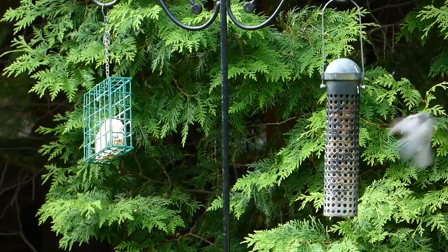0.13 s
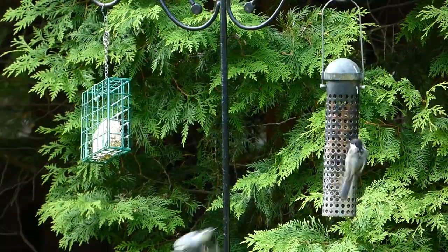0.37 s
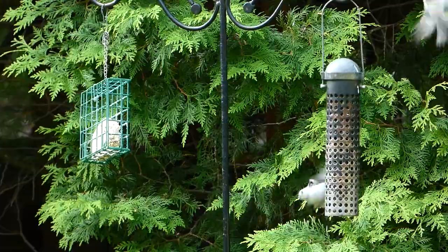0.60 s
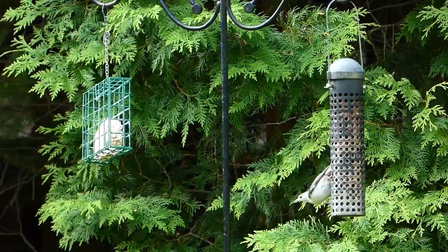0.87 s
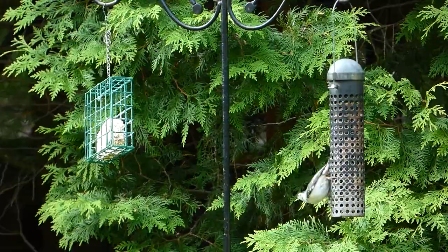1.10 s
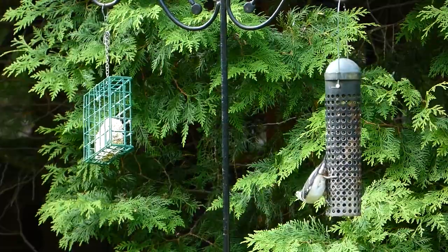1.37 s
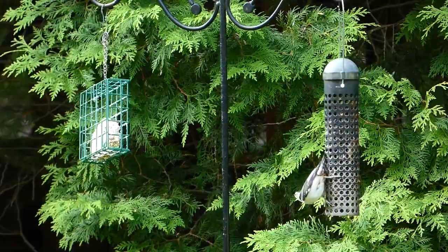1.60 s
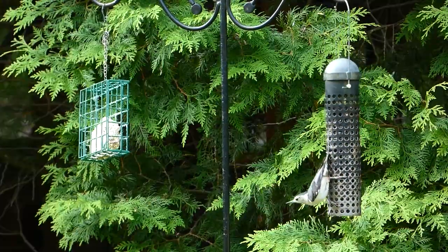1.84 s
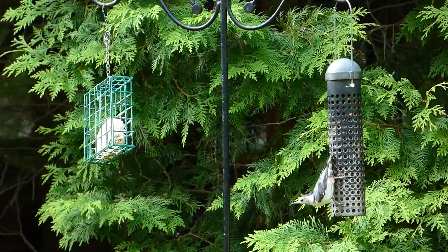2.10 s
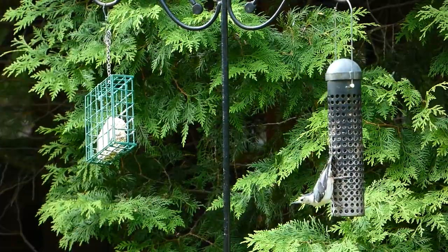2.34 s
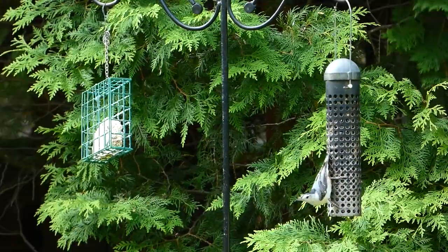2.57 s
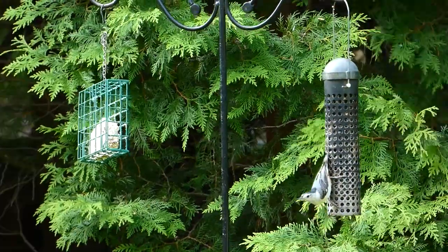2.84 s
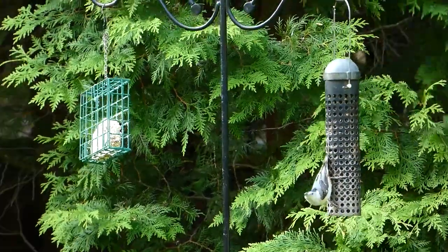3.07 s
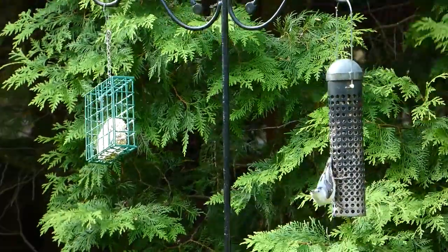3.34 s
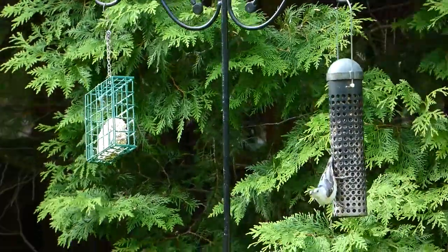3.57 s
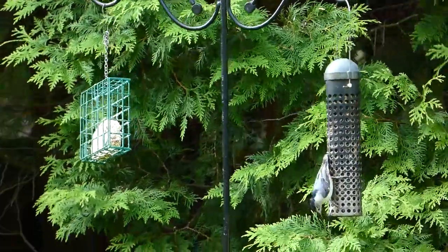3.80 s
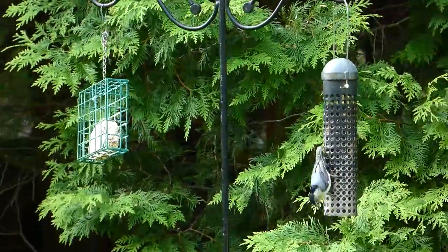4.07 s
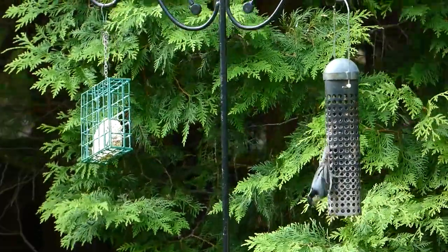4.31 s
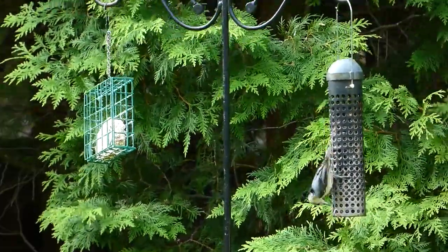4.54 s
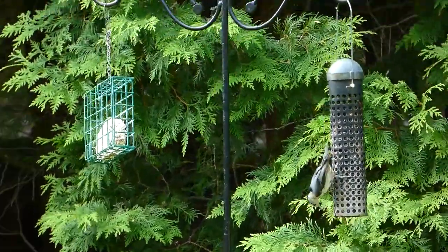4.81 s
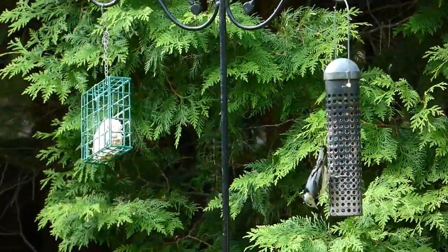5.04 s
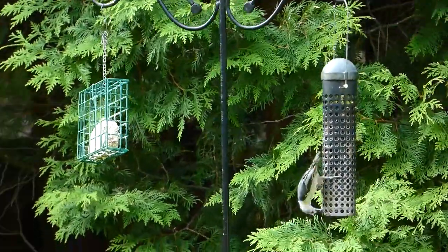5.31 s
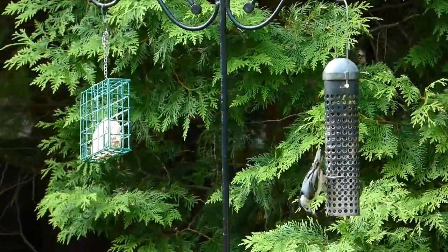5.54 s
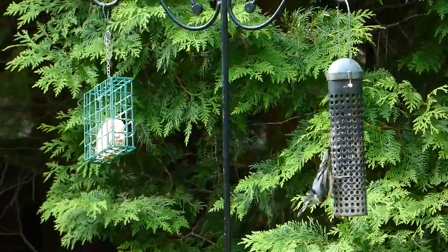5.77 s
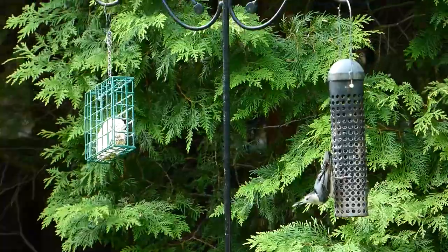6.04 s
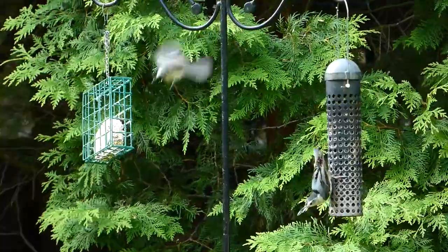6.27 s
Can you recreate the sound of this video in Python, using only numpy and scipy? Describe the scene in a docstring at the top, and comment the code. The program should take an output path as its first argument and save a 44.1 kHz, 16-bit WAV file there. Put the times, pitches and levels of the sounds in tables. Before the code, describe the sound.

Outdoor stereo sound of small birds at hanging feeders beside evergreen foliage. A hoarse, nasal jay screeches twice early and twice later. Between them come thin whistles, fast sliding chirps, a four-times-repeated rising pair and a rapid trill. Buzzy notes follow, then a thinner stretch and a final cluster of clear chirps as a bird whirs off. Faint beak or claw taps, quiet traffic rumble and a briefly swelling motor hum sit behind.

```python
"""Backyard birds

A jay screams four times with both halves of its voice box (products of two oscillators), songbirds whistle
and trill (gliding tones) and buzz (harmonics under a resonance), something ticks on a feeder (noise taps) and
wings flutter past at the end (pulsed noise). Trees and house walls smear and echo every note (convolution)
over a low suburban rumble (shaped noise) and a motor hum that swells, then fades (a wavering tone)."""
import sys
import numpy as np
from scipy import signal
from scipy.fft import rfft, irfft
from scipy.io import wavfile
from scipy.ndimage import uniform_filter1d, map_coordinates

SR = 44100
rng = np.random.default_rng(int(sys.argv[2]) if len(sys.argv) > 2 else 0)


def volts(x):
    """Linear amplitude factor 10**(x/20) for a level x in dB, scalar or array-like."""
    e = np.asarray(x, float) / 20
    return 10 ** e


def put_to_file(sound):
    """Save the sound as 16-bit audio at rate SR, in the file named by the first command-line argument."""
    columns = np.atleast_2d(sound).T  # one column per channel
    safe = np.clip(columns, -1, 1)
    whole_steps = np.round(safe * 32767)
    wavfile.write(sys.argv[1], SR, whole_steps.astype(np.int16))


N = 282240  # length of the scene [samples]


def coloured(points, size=N):
    """Spectral shaping: noise of rms 1 whose spectrum follows (frequency [Hz], level [dB]) points."""
    hz, db = np.transpose(points)
    f = np.maximum(np.arange(size // 2 + 1) * SR / size, 1)
    gain = volts(np.interp(np.log(f), np.log(hz), db))
    x = irfft(rfft(rng.standard_normal(size)) * gain, size)
    return x / x.std()


def curve(points):
    """Linear interpolation: a (time [s], value) table read at every sample."""
    return np.interp(np.arange(N) / SR, *np.transpose(points))


def walk(rate):
    """Low-pass random modulation: levels held 1 / rate s and smoothed twice; spread near 1."""
    hold = int(SR / rate)
    steps = rng.standard_normal(N // hold + 1)
    held = np.repeat(steps, hold)
    return 1.28 * uniform_filter1d(uniform_filter1d(held, hold), hold)[:N]


def add(out, s, x):
    """Superposition: mixes x into out from time s."""
    a = int(s * SR)
    out[a:a + len(x)] += x[:N - a]


# spectrum of distant traffic and leaves: (frequency [Hz], density [dB per Hz])
YARD_SPECTRUM = [(15, -31), (25, -13), (50, -8.5), (100, 1.5), (130, 3), (170, -6.5), (260, 0), (420, -5.5),
                 (630, -9.5), (1000, -9), (1700, -16.5), (2500, -13.5), (4000, -12), (6300, -14.5),
                 (8500, -21), (11000, -23), (15500, -39)]
# likeness of the two channels: (frequency [Hz], left-right correlation)
CHANNEL_LIKENESS = [(60, 0.71), (130, -0.28), (290, -0.53), (640, -0.57), (1410, -0.23), (3100, 0.55),
                    (6820, 0.71), (15000, -0.006)]
# balance of the two channels: (frequency [Hz], left minus right [dB])
CHANNEL_BALANCE = [(25, 6), (80, -11), (160, 1), (300, 0.5), (1000, -.5), (15000, -0.5)]
# motor hum before its waver and its balance: (time [s], level [dB])
HUM_LEVEL = [(0, -72.5), (1, -64), (2, -67), (3, -71.5), (4, -76.5), (6.4, -96)]
YARD_DB, YARD_SWELL_DB = -63, 0.9  # middle level of the air noise, spread of its slow swell


def yard():
    """Partial coherence: shared and opposed noise of traffic and leaves mixed by frequency, plus a hum."""
    f = np.log(np.maximum(np.arange(N // 2 + 1) * SR / N, 1))
    like_hz, like = np.transpose(CHANNEL_LIKENESS)
    like = np.clip(np.interp(f, np.log(like_hz), like), -0.95, 0.95)
    balance_hz, balance_db = np.transpose(CHANNEL_BALANCE)
    tilt_db = np.interp(f, np.log(balance_hz), balance_db) / 2
    mid = rfft(coloured(YARD_SPECTRUM))
    side = rfft(coloured(YARD_SPECTRUM)) * np.sqrt((1 - like) / (1 + like))
    air = irfft(np.array([(mid + side) * volts(tilt_db), (mid - side) * volts(-tilt_db)]), N)
    air = air * volts(YARD_DB + YARD_SWELL_DB * walk(2.224))
    hum_hz = 137 + 2.41 * walk(11)
    hum = np.sin(2 * np.pi * np.cumsum(hum_hz) / SR) * volts(curve(HUM_LEVEL) + 2.3 * walk(17))
    return air + hum * volts(np.array([[-2.0], [3.0]]))


# jay screams, pitches before scoop and sag, level before swell and flutter:
# (time [s], length [s], upper voice [Hz], lower voice [Hz], level [dB])
SCREAMS = [(0.249, 0.33, 1819, 965.6, -49.5), (0.987, 0.32, 1805, 949.4, -50.5),
           (3.693, 0.294, 1799, 922, -49.5), (4.442, 0.32, 1814, 905.5, -51.5)]
# the two voices multiply each other, so lines stand at sums of both: (multiple of upper, multiple of lower)
SUM_LINES = [(0, 1), (1, 0), (1, 1), (0, 3), (2, 0), (1, 2), (2, 1), (1, 3), (3, 0), (2, 2), (3, 1), (2, 3),
             (4, 0), (3, 2), (4, 1), (5, 0), (4, 2), (5, 1)]
# base level of each sum line: (level [dB])
SUM_LINE_DB = [-26, -4, -1, -32, -1, -3.5, -8.5, -19, -10, -26, -13, -14.5, -19.5, -24.5, -32, -27, -22.5,
               -36]
# tilt of each scream as the bird turns its head: (change per step up the stack [dB])
SCREAM_TILT_DB = [0.0, -.3, -1.4, -1.7]
# both voices scoop up to pitch (share of pitch, time constant); the upper one then sags faster and faster
SCOOP_UPPER, SCOOP_UPPER_S, SCOOP_LOWER, SCOOP_LOWER_S, SAG_HZ_PER_S2 = 0.23, 0.013, 0.14, 0.035, 1600
JAY_ATTACK_S, JAY_RELEASE_S, JAY_SWELL_DB_PER_S = 0.036, 0.026, 6.0
JAY_BALANCE_DB = 2.6  # spread by which each line swells and fades on its own


def jay():
    """Intermodulation: two unsteady oscillators sound at their sum lines, with a rasp of breath on each."""
    out = np.zeros(N)
    upper_wobble, lower_wobble, flutter = walk(120), walk(120), walk(60)
    balance = [volts(JAY_BALANCE_DB * walk(22)) for _ in SUM_LINES]
    rasp = coloured([(1, 11.5), (300, 5.0), (650, 0.5), (20000, -52)])
    for (s, length_s, upper_hz, lower_hz, db), tilt_db in zip(SCREAMS, SCREAM_TILT_DB):
        on = slice(int(s * SR), int((s + length_s) * SR))
        t = np.arange(on.stop - on.start) / SR
        upper_hz = upper_hz * (1 - SCOOP_UPPER * np.exp(-t / SCOOP_UPPER_S)) - SAG_HZ_PER_S2 * t ** 2
        lower_hz = lower_hz * (1 - SCOOP_LOWER * np.exp(-t / SCOOP_LOWER_S))
        upper = 2 * np.pi * np.cumsum(upper_hz * (1 + 0.00502 * upper_wobble[on])) / SR
        lower = 2 * np.pi * np.cumsum(lower_hz * (1 + 0.00502 * lower_wobble[on])) / SR
        # the voice turns hoarser as the breath runs out, most of all high in the stack
        hoarse = np.linspace(0.015, 0.085, len(t))
        # one step of the stack speaks first, the rest as the beak opens
        opening = 1 - np.exp(-(t / 0.031) ** 2)
        lines = np.zeros(len(t))
        for (m, n), line_db, own in zip(SUM_LINES, SUM_LINE_DB, balance):
            step = 2 * m + n  # height in the stack
            line = volts(line_db + tilt_db * max(step - 4.5, -1.5)) * np.sin(m * upper + n * lower)
            line = line * (1 + step * hoarse * rasp[on]) * own[on]
            lines += line if step == 4 else line * opening
        edges = np.minimum(1, np.minimum(t / JAY_ATTACK_S, (length_s - t) / JAY_RELEASE_S)) ** 0.74
        swell_db = JAY_SWELL_DB_PER_S * (t - length_s / 2)
        out[on] = lines * edges * volts(db + swell_db + 1.57 * flutter[on])
    return out


# ground and house walls: (delay [s], level before a common 21 dB cut [dB], spread [s])
REFLECTIONS = [(.007, -6.5, 0.003), (0.015, -7, 0.0034), (0.088, -12, 0.0014), (0.176, -26.5, 0.0043)]


def outdoors(x):
    """Impulse response: direct sound, leaf scatter, echoes and a thin tail, partly unlike in each ear."""
    t = np.arange(SR) / SR
    leaves = volts(-35) * np.exp(-t / 0.046)
    # the tail loses 60 dB in 1.164 s
    tail = volts(-43) * np.exp(-np.log(1000) * t / 1.164) * (1 - np.exp(-t / 0.006))
    # each echo comes back spread over a few milliseconds
    walls = sum(volts(db - 21) * np.exp(-((t - delay) / spread) ** 2) for delay, db, spread in REFLECTIONS)
    envelope = np.sqrt(leaves ** 2 + tail ** 2 + walls ** 2)
    air = [(100, -2.5), (1900, -12), (3000, -4.0), (6000, 1), (9000, -2.5), (16000, -12.5)]
    mid = coloured(air, size=SR) * envelope
    side = coloured(air, size=SR) * envelope
    response = np.array([mid + 0.34 * side, mid - 0.53 * side])
    # swaying foliage shifts the reflected paths by a few samples, which blurs held tones
    swayed = map_coordinates(x, [np.arange(N) + 1.47 * walk(45)], order=3)
    return x + signal.fftconvolve(swayed[None], response, axes=1)[:, :N]


# short soft hoots far off: (time [s], length [ms], middle pitch [Hz], level [dB])
FAR_HOOTS = [(0.331, 56, 418, -59.5), (3.07, 47, 455, -66.5), (3.58, 45, 440, -65.5)]
# held whistles: (time [s], length [ms], middle pitch [Hz], level [dB])
HELD_NOTES = [(5.218, 15, 3550, -65), (6.077, 24, 4130, -68), (.641, 12, 4030, -55.5),
              (1.447, 27, 4150, -52), (1.584, 65, 3960, -59), (1.636, 90, 4096, -48.5),
              (1.732, 28, 4115, -49), (1.842, 23, 6320, -58), (2.44, 54, 5230, -60),
              (2.518, 55, 4460, -50.5), (3.587, 20, 6080, -59), (3.643, 7.5, 4930, -48),
              (5.341, 54, 3930, -64.5), (6.105, 16, 5460, -59), (6.193, 11, 5350, -52.5)]
ARCH = 0.0225  # share of the pitch by which both ends lie lower


def held_notes():
    """Pitch arch: each note, as (s, ms, start Hz, middle Hz, end Hz, dB), is highest at half length."""
    return [(s, ms, hz * (1 - ARCH), hz, hz * (1 - ARCH), db)
            for s, ms, hz, db in list(HELD_NOTES) + list(FAR_HOOTS)]


def whistles():
    """Near-sinusoidal phonation: tones glide along parabolas, with a faint octave and an uneven breath."""
    out, waver = np.zeros(N), 1 + 0.007 * walk(400)
    for s, ms, start_hz, mid_hz, end_hz, db in held_notes() + glides() + paired_notes() + trill():
        u = np.linspace(0, 1, int(ms * SR / 1000))
        # the parabola through the start, middle and end pitch
        hz = start_hz * (1 - u) * (1 - 2 * u) + 4 * mid_hz * u * (1 - u) + end_hz * u * (2 * u - 1)
        phase = 2 * np.pi * np.cumsum(hz * np.resize(waver[int(s * SR):], len(u))) / SR
        swell = np.sin(np.pi * u ** 0.83) ** 0.5
        add(out, s, volts(db) * swell * (np.sin(phase) + volts(-39) * np.sin(2 * phase)))
    breath = coloured([(1, 11), (500, -6.5), (1400, -8.5), (20000, -43)])
    return out * volts(0.53 * walk(250)) * (1 + 0.11 * breath)


# beak and claw ticks on the feeder: (time [s], level at the onset [dB])
FEEDER_TICKS = [(0.59, -55), (0.8874, -58), (3.4083, -56), (4.8469, -55), (6.2477, -56.5)]
# spectrum of a tick: (frequency [Hz], density [dB per Hz])
TICK_SPECTRUM = [(1000, -41), (4000, -5), (8500, -8), (12000, -15), (16000, -18)]


def ticks():
    """Impact excitation: very short bright noise taps that decay exponentially."""
    out, n = np.zeros(N), np.arange(400)
    for s, db in FEEDER_TICKS:
        add(out, s, volts(db) * coloured(TICK_SPECTRUM, size=len(n)) * np.exp(-n / 91))
    return out


# chirps, and two wall echoes of the one at 3.68 s, leap away from their start and settle:
# (time [s], length [ms], start [Hz], end [Hz], level [dB])
EARLY_LEAPS = [(1.582, 12, 5290, 6300, -53.5), (1.614, 40, 8140, 6560, -63.5), (1.644, 60, 6570, 6200, -64),
               (1.766, 35, 4275, 2570, -42), (1.79, 53, 6100, 7930, -62), (1.795, 16.2, 4180, 5120, -47.5),
               (1.814, 23, 4130, 2893, -42.5), (1.827, 33, 4760, 3384, -46),
               (1.867, 18.5, 4630, 5510, -52.5), (1.985, 12, 4250, 4600, -55),
               (1.989, 36, 6200, 7160, -57.5), (2.166, 19, 6900, 4660, -49),
               (2.285, 13.6, 6400, 4530, -49.5), (2.4, 16, 6220, 4530, -51), (2.501, 23, 3980, 3540, -50),
               (3.615, 19, 4760, 8590, -42.5), (3.679, 22, 4840, 7730, -40.5), (3.765, 30, 6600, 7750, -64),
               (3.855, 43, 6620, 7170, -55), (3.859, 26, 3640, 2670, -43.5), (5.248, 26, 3680, 2960, -53.5),
               (5.398, 47, 3640, 2723, -45), (6.175, 21, 3440, 4900, -48.5), (6.286, 48, 3125, 2200, -43),
               (6.363, 49, 2400, 2885, -40.5)]
# slides move almost evenly: (time [s], length [ms], start [Hz], end [Hz], level [dB])
EVEN_SLIDES = [(.837, 21.6, 5280, 4930, -71.5), (.848, 15, 7600, 5530, -59), (.924, 30, 7900, 5970, -64),
               (1.694, 30, 5290, 4300, -55.5), (1.704, 37, 5940, 8030, -60), (1.717, 26, 4100, 2544, -42.5),
               (1.773, 14, 6550, 5230, -57.5), (1.859, 17, 3460, 2200, -53.5), (1.914, 41, 5210, 3150, -50),
               (2.467, 26, 5300, 5640, -55.5), (3.637, 11, 8300, 5330, -55), (3.9, 16, 5680, 4250, -54),
               (3.926, 18.3, 2180, 3150, -40.5), (3.996, 17.8, 2144, 2960, -47),
               (4.014, 23.4, 2850, 2346, -42), (5.443, 68, 3010, 2255, -43), (6.125, 30, 4400, 3100, -49),
               (6.18, 16, 3330, 4260, -52), (6.2, 20, 4380, 3670, -48), (6.26, 30, 3770, 2500, -41.5)]
# slurs linger and run off at the end: (time [s], length [ms], start [Hz], end [Hz], level [dB])
LATE_SLURS = [(1.365, 17, 7330, 6250, -61.5), (1.542, 12, 3350, 2560, -59.5), (1.588, 7.8, 6440, 4900, -54),
              (2.029, 30, 5300, 4530, -54.5), (2.052, 14, 4500, 3690, -47.5), (2.52, 40, 5610, 4650, -55.5),
              (3.876, 58, 2687, 1997, -44), (3.942, 58, 2794, 2095, -44), (4.841, 25, 7830, 7130, -64),
              (5.281, 27, 2974, 4920, -45), (5.324, 21.8, 3706, 4290, -43), (5.38, 34, 4050, 3400, -52.5),
              (5.45, 11.6, 3410, 2810, -39.5), (6.091, 33, 4720, 5500, -61.5), (6.335, 22, 2130, 2430, -43)]
LEAP_BEND, SLIDE_BEND, SLUR_BEND = 0.243, 0.55, 0.73  # share of the glide still to go at half length


def glides():
    """Frequency modulation: the bend of each glide sets the pitch it has reached at half length."""
    tables = (EARLY_LEAPS, LEAP_BEND), (EVEN_SLIDES, SLIDE_BEND), (LATE_SLURS, SLUR_BEND)
    return [(s, ms, start_hz, end_hz + bend * (start_hz - end_hz), end_hz, db)
            for table, bend in tables for s, ms, start_hz, end_hz, db in table]


# a two-note figure sung four times: (time of the upper note [s], level [dB])
PAIR_STARTS = [(2.113, -42), (2.229, -41), (2.344, -42.5), (2.461, -42.5)]
# its notes: (offset [s], length [ms], start [Hz], middle [Hz], end [Hz], relative level [dB])
PAIR_NOTES = [(-.017, 13, 2980, 3150, 3400, -8.5), (0, 12.5, 3624, 3950, 4040, -0.5)]


def paired_notes():
    """Motif repetition: a low and a high rising note follow each other closely."""
    return [(s + lag, *shape, db + note_db)
            for s, db in PAIR_STARTS for lag, *shape, note_db in PAIR_NOTES]


# an even trill that swells: (first note [s], period [s], first level [dB], level approached [dB])
TRILL_COURSE = (2.571, .0455, -57, -49)
# each stroke is a thin high flick, then a falling note:
# (offset [s], length [ms], start [Hz], middle [Hz], end [Hz], relative level [dB])
TRILL_NOTES = [(-.012, 12, 4500, 4250, 3900, -16), (.002, 14, 3400, 3220, 3080, 0)]


def trill():
    """Periodic repetition: nine strokes at a steady pace; the level rises fast, then levels off."""
    first_s, period_s, first_db, last_db = TRILL_COURSE
    return [(first_s + k * period_s + lag, *shape, db + last_db + (first_db - last_db) * 0.5 ** k)
            for k in range(9) for lag, *shape, db in TRILL_NOTES]


# buzzed notes: (time [s], length [ms], start pulse rate [Hz], end pulse rate [Hz], level [dB])
BUZZED_NOTES = [(4.078, 85, 520, 680, -51), (4.18, 80, 436, 418, -53.5)]
# the throat band of a buzz at a middle level; a louder buzz opens the beak: higher and wider
THROAT_HZ, THROAT_WIDTH_HZ, THROAT_AT_DB, THROAT_HZ_PER_DB = 3700, 800, -54, 280


def buzzes():
    """Source and filter: a fast pulse train's harmonics 3 to 15 under one throat resonance."""
    out, shake = np.zeros(N), walk(200)
    k = np.arange(3, 16)[:, None]
    for s, ms, start_hz, end_hz, db in BUZZED_NOTES:
        throat_hz = THROAT_HZ + THROAT_HZ_PER_DB * (db - THROAT_AT_DB)
        width_hz = THROAT_WIDTH_HZ * volts(2 * (db - THROAT_AT_DB))
        u = np.linspace(0, 1, int(ms * SR / 1000))
        hz = (start_hz + (end_hz - start_hz) * np.sqrt(u)) * (1 + 0.0222 * shake[int(s * SR):][:len(u)])
        resonance = 1 / (1 + (2 * (k * hz - throat_hz) / width_hz) ** 4) + 0.03
        harmonics = np.sin(k * 2 * np.pi * np.cumsum(hz) / SR)
        add(out, s, volts(db) * np.sin(np.pi * u) ** 0.85 * (resonance * harmonics).sum(axis=0))
    return out


# spectrum of the air moved by wings: (frequency [Hz], density [dB per Hz])
WING_SPECTRUM = [(300, -14.5), (800, -4), (1050, -6), (1250, 1), (1500, -3), (2000, -7.5), (2800, -14.5),
                 (6000, -38), (12000, -80)]
# a bird takes off: the flutter rises at once, peaks and draws away
WING_START_S, WING_RISE_S, WING_PEAK_S, WING_PASS_S, WING_DB = 6.07, 0.013, 6.26, 0.14, -51.5
WING_BEAT_HZ = 20.0


def wings():
    """Amplitude modulation: turbulent air puffed once per wing beat."""
    t = np.arange(N) / SR
    beat = (1 + 0.3 * np.sin(2 * np.pi * WING_BEAT_HZ * t)) * volts(2.5 * walk(40))
    rise = np.clip((t - WING_START_S) / WING_RISE_S, 0, 1)
    passing = volts(WING_DB) / (1 + ((t - WING_PEAK_S) / WING_PASS_S) ** 2)
    return coloured(WING_SPECTRUM) * beat * rise * passing


def scene():
    """Superposition: all birds share the yard's acoustics, the ticks centred, the rest a little aside."""
    # gains are left, right [dB]
    screams = outdoors(jay()) * volts(np.array([[0.3], [-0.3]]))
    songbirds = outdoors(whistles() + buzzes()) * volts(np.array([[-0.4], [0.4]]))
    flutter = outdoors(wings()) * volts(np.array([[-4.0], [-2.5]]))
    return screams + songbirds + outdoors(ticks()) + flutter + yard()


def low_pass(x):
    """Removes everything above the highest recorded frequency."""
    return signal.sosfilt(signal.butter(12, 15600, fs=SR, output="sos"), x)


def record(dry):
    """Signal chain: the finished mix goes through the last stage."""
    return low_pass(dry)


dry = scene()
out = record(dry)
put_to_file(out)
```